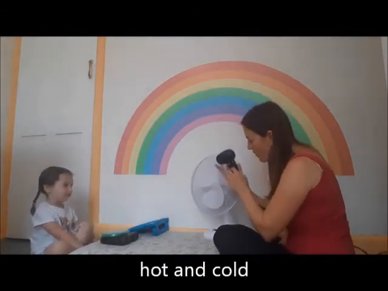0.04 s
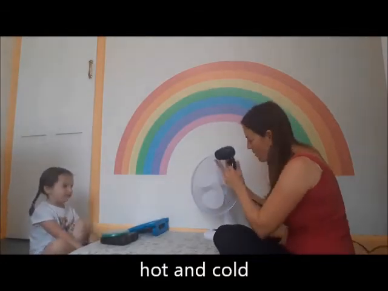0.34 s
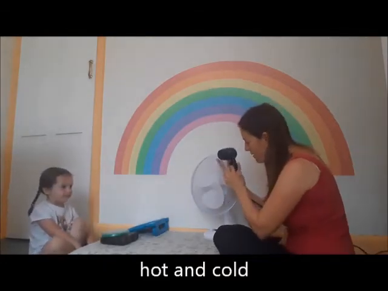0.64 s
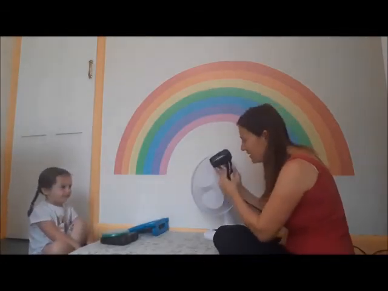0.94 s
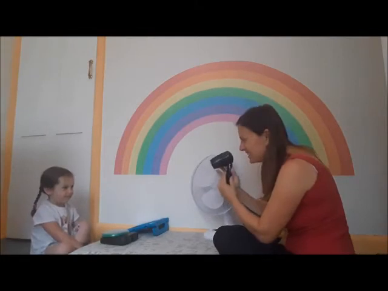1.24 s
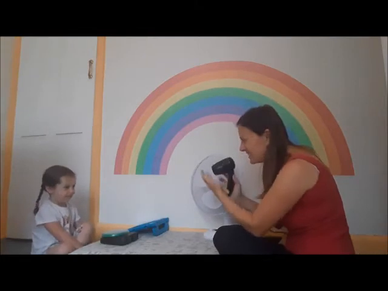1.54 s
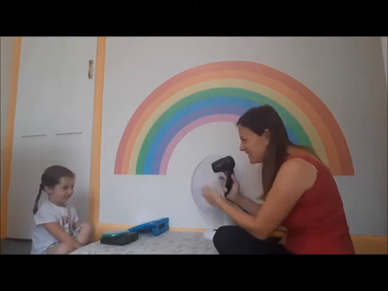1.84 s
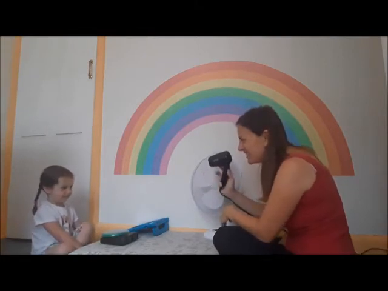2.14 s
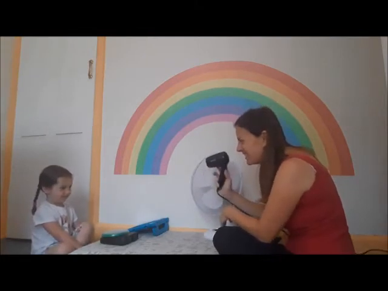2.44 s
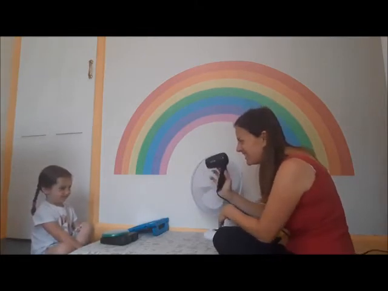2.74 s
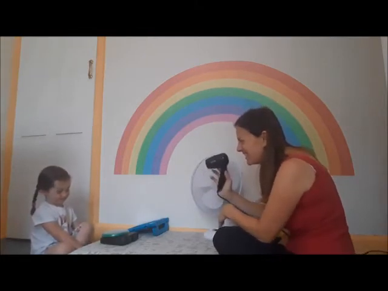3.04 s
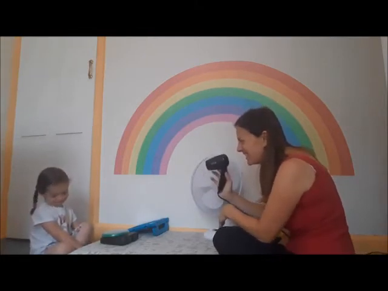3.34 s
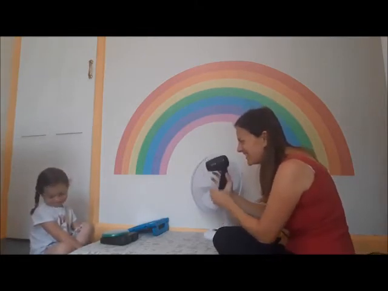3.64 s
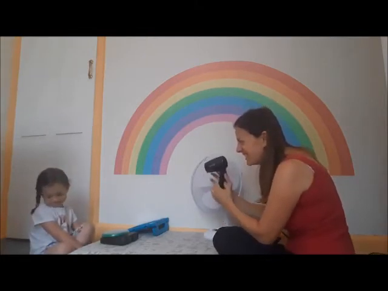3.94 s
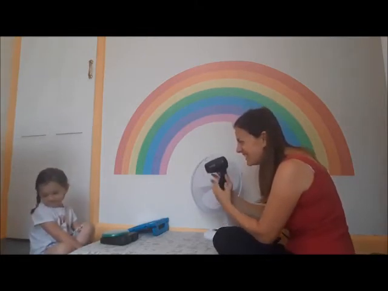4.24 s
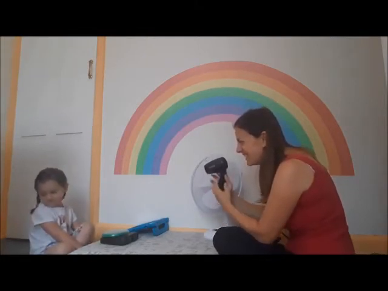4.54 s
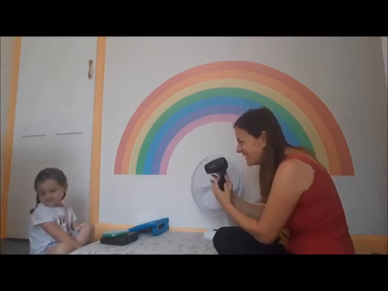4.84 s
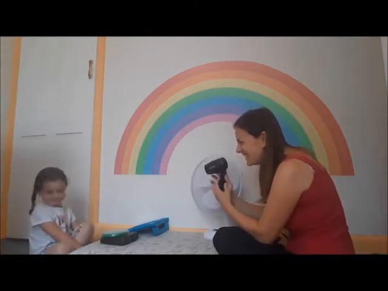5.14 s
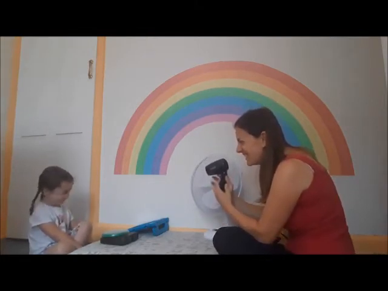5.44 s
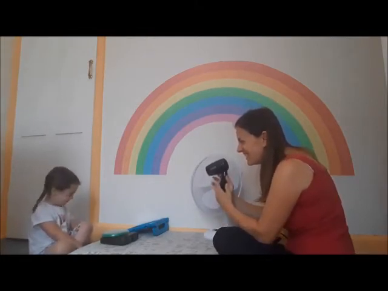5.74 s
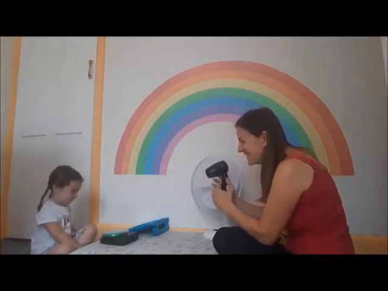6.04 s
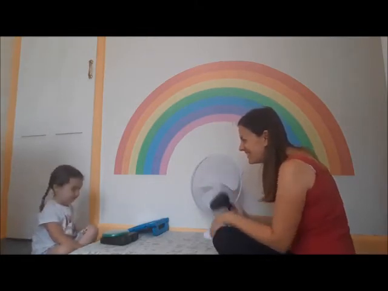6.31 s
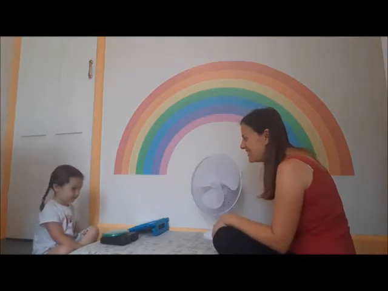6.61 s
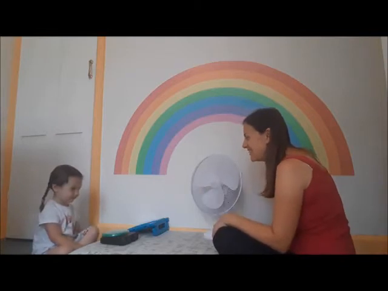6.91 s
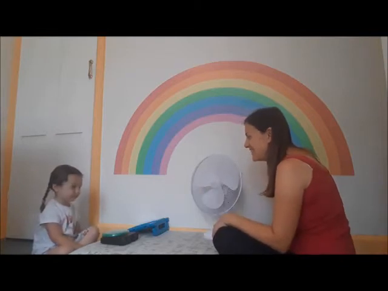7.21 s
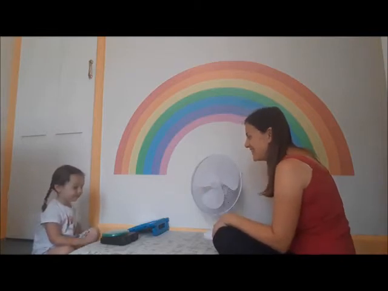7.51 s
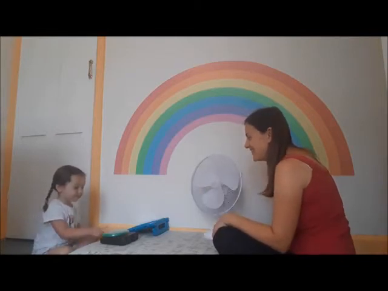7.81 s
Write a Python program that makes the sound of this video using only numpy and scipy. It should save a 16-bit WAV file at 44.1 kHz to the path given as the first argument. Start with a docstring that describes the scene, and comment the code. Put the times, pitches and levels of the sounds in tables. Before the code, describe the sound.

For the first 0.7 seconds there are soft shuffles, dull bumps and light scuffs of fingers on plastic as a small hair dryer is taken up. At about 0.7 seconds the switch snaps and the motor rises quickly in pitch, settling into a steady, hissing rush of air with a low hum and a higher whine. A dull handling bump comes at around 1.2 seconds. The blowing stays even, with the whine a little stronger from about 3.5 to 5 seconds. At 5.7 seconds the switch clicks off sharply. The air dies away and the motor winds down with a faint hiss and a slight squeak. At about 6.4 seconds the dryer lands on the floor with a short plastic clatter, followed by a soft thud or two. Only a faint room rumble remains until nearly 8 seconds. Everything is close, with a short, bare-room echo.

```python
"""Soft bumps and shuffling come first: in a bare room, near a pair of microphones, hands take up a
small hair dryer and rub its plastic. The switch snaps and the motor runs up. For five seconds the
seven-bladed fan hums and whines over the rush of turbulent air in the barrel. The switch snaps off,
the brushes hiss as the rotor coasts to rest, and the dryer clatters down on the floor."""
import sys
import numpy as np
from scipy import signal
from scipy.fft import rfft, irfft, next_fast_len
from scipy.io import wavfile

SR = 44100
rng = np.random.default_rng(int(sys.argv[2]) if len(sys.argv) > 2 else 0)


def log_audio(samples):
    """Write samples as a 16-bit WAV file to the path given in sys.argv[1]."""
    # one column per channel
    frames = np.atleast_2d(samples).T
    # limit to full scale, then quantise
    limited = np.clip(frames, -1, 1)
    pcm = np.round(limited * 32767).astype(np.int16)
    wavfile.write(sys.argv[1], SR, pcm)


N = 346934
TIME = np.arange(N) / SR
PADDED = next_fast_len(N + SR, True)
HZ = np.maximum(np.fft.rfftfreq(PADDED, 1 / SR), 1)


def from_db(db):
    """Decibels to gain."""
    return 10 ** (np.asarray(db) / 20)


def in_time(rows):
    """Each column of a curve at every sample."""
    s, *columns = np.transpose(rows)
    return [np.interp(TIME, s, column) for column in columns]


def at_hz(points, hz=HZ):
    """Read a table on a log-frequency axis."""
    at, value = np.transpose(points)
    return np.interp(np.log(hz), np.log(at), value)


def lift_db(resonances, hz):
    """How much a set of resonances raises each frequency."""
    return sum(lift / (1 + (2 * (hz - centre) / width) ** 2) for centre, width, lift in resonances)


def response(spectrum, resonances=()):
    """Causal filter with a broad colour and narrow resonances; keeps the power of white noise."""
    gain = from_db(at_hz(spectrum) + lift_db(resonances, HZ))
    cepstrum = irfft(np.log(gain / np.sqrt(np.mean(gain ** 2))), PADDED)
    cepstrum[1:PADDED // 2] *= 2
    cepstrum[PADDED // 2 + 1:] = 0
    return np.exp(rfft(cepstrum))


def filtered(x, gain):
    """Pass a sound through a frequency response."""
    return irfft(rfft(x, PADDED) * gain, PADDED)[..., :N]


def panned(db):
    """Microphone gains for a sound that is db louder on the left."""
    gains = from_db(np.array([[.5], [-.5]]) * db)
    return gains / np.sqrt(np.mean(gains ** 2, axis=0))


# Left-right likeness of background and contact sounds: wide in the mids, nearly mono above 7 kHz.
# Each row: frequency in Hz, left-right correlation.
STEREO_LIKENESS = [(130, .92), (340, .62), (500, .3), (1100, .25), (1600, -.15), (2500, .05), (6700, -.05),
                   (7100, .72), (8000, .9), (14000, .94)]

def at_microphones(pair, likeness=STEREO_LIKENESS):
    """Spectra of two unrelated sounds, mixed to a given left-right likeness."""
    mid, side = rfft(pair, PADDED)
    alike = at_hz(likeness)
    return (np.sqrt(1 + alike) * mid + np.sqrt(1 - alike) * side * [[1], [-1]]) / np.sqrt(2)


def radiated(pair, gain, likeness=STEREO_LIKENESS):
    """Sound coloured by its source and spread between left and right."""
    return irfft(at_microphones(pair, likeness) * gain, PADDED)[:, :N]


def noise(gain, likeness=STEREO_LIKENESS):
    """Steady stereo noise through a response."""
    return radiated(rng.standard_normal((2, PADDED)), gain, likeness)


def drift(rate_hz):
    """Slow random wander with spread 1."""
    slow = filtered(rng.standard_normal(PADDED), 1 / (1 + (HZ / rate_hz) ** 2))
    return slow / slow.std()


def swells(rows):
    """Gain of soft sounds that each swell to a peak and fade again."""
    return sum(from_db(db) * np.exp(-((TIME - s) / half_length) ** 2) for s, db, half_length in rows)


def placed(s, db, sound):
    """A short sound set at its time; db is its energy per channel."""
    out, start = np.zeros((2, N + SR)), int(s * SR)
    unit_energy = sound / np.linalg.norm(sound, axis=-1, keepdims=True)
    out[:, start:start + sound.shape[-1]] = from_db(db) * unit_energy
    return out[:, :N]


# The still room, all around the microphones. Each row: frequency in Hz, relative level in dB.
ROOM_TONE = [(25, -30.5), (58, -26), (82, 0), (135, -3.5), (165, -13), (220, -5.5), (300, -21.5),
             (460, -9.5), (640, -29.5), (850, -9), (1100, -10.5), (1600, -28), (5500, -38), (15000, -36)]

def room_tone(level_db=-67.5):
    """A faint, steady rumble lies under everything."""
    return noise(response(ROOM_TONE) * panned(1.5)) * from_db(level_db)


# Movement by the dryer. Each row: peak time in seconds, level in dB, half length in seconds.
SHUFFLES = [(0.1, -64, 0.37), (0.7, -64.5, 0.29), (6.25, -65.5, 0.3)]
# Its muffled colour. Each row: frequency in Hz, relative level in dB.
SHUFFLE_COLOUR = [(50, -33), (90, -7), (220, -3.5), (370, -2), (620, -13.5), (900, -4.5), (1700, -29.5),
                  (5500, -33.5), (7600, -27.5), (15000, -36)]

def shuffling(swing_db=2):
    """Soft, uneven shuffling as the dryer is taken up and put down."""
    return noise(response(SHUFFLE_COLOUR)) * swells(SHUFFLES) * from_db(swing_db * drift(11.4))


def contact(s, db, rise_s):
    """A cluster of tiny impacts that swells and dies away, drawn twice for a stereo spread."""
    age = np.arange(SR // 4) / SR / rise_s
    return placed(s, db, rng.standard_normal((2, len(age))) * age * np.exp(-age))


def thud(s, db, rise_s, hz):
    """A heavily damped body swings for a few cycles under a push."""
    age = np.arange(SR // 4) / SR
    return placed(s, db, np.sin(2 * np.pi * hz * age) * age * np.exp(-age / rise_s))


# Bumps of hand and body, then the landing on the floor. Each row: start in seconds, clatter level
# before dulling in dB, rise in seconds, dulling cutoff in Hz, thud pitch in Hz, thud level in dB.
BUMPS = [(0.017, -36, 0.011, 447, 352, -26.5), (0.366, -27, 0.034, 400, 210, -25.5),
         (0.485, -20, 0.0053, 700, 250, -26), (0.541, -20, 0.0046, 396.5, 239, -18.5),
         (0.549, -28, 0.0093, 493, 370.5, -14), (1.168, -12.5, .02, 507, 479, -18.5),
         (1.19, -30, 0.006, 500, 236, -11), (6.086, -23, 0.022, 600, 185, -43),
         (6.398, -15, 0.0051, 10000, 216, -13.5), (6.41, -9.5, 0.0072, 9100, 375, -13.5),
         (6.424, -23, 0.0055, 2000, 244, -10), (6.684, -17.5, 0.024, 262, 98.6, -27),
         (6.817, -31, 0.019, 199, 127, -34.5)]
# The clatter's colour. Each row: frequency in Hz, relative level in dB.
BUMP_COLOUR = [(50, -31), (110, -28), (220, -6.5), (380, 4), (620, -10), (900, -4.5), (1300, -4.5),
               (1900, -13.5), (2800, -11), (5000, -16), (8000, -22), (15000, -34)]

def bumps(room, clatter_wet_db=-1, thud_wet_db=-9):
    """Each bump is a thud with some clatter: dull for hands, bright when the dryer lands."""
    clatter, thuds = 0, 0
    for s, db, rise_s, dull_hz, thud_hz, thud_db in BUMPS:
        dulling = signal.butter(2, dull_hz, fs=SR, output="sos")
        clatter = clatter + signal.sosfilt(dulling, contact(s, db, rise_s) + 1e-18)
        thuds = thuds + thud(s, thud_db, rise_s, thud_hz)
    clatter = radiated(clatter, response(BUMP_COLOUR) * (1 + from_db(clatter_wet_db) * room))
    return clatter + filtered(thuds, 1 + from_db(thud_wet_db) * room)


# The bare room's reverberation. Each row: frequency in Hz, time to fall 60 dB in seconds.
ROOM_T60 = [(150, 0.35), (400, 0.324), (1200, 0.39), (3000, 0.38), (7500, 0.3), (15000, 0.23)]

def room_response(build_s=0.0054):
    """Diffuse echoes build up at the microphones and die away band by band."""
    age, tail = np.arange(SR) / SR, 0
    spectrum, hz = rfft(rng.standard_normal((2, SR))), np.arange(SR // 2 + 1)
    edges_hz = [0, 300, 700, 2000, 5000, 10000, SR / 2]
    for low, high in zip(edges_hz, edges_hz[1:]):
        band = irfft(spectrum * ((hz >= low) & (hz < high)))
        tail = tail + band * from_db(-60 * age / at_hz(ROOM_T60, (low + high) / 2))
    tail = tail * (1 - np.exp(-(age / build_s) ** 2))
    return at_microphones(tail / np.sqrt(np.sum(tail ** 2) / 2))


# Scuffs on the handle. Each row: start in seconds, level in dB, rise in seconds.
RUBS = [(0.198, -35, 0.001), (0.212, -38, 0.0083), (0.5, -35, 0.019), (0.578, -34.5, 0.0016),
        (0.687, -29, 0.002), (0.692, -29, 0.0063), (5.926, -21, 0.00054), (6.142, -30, 0.0085),
        (6.568, -40.5, 0.04)]
# Skin on plastic. Each row: frequency in Hz, relative level in dB.
RUB_COLOUR = [(300, -14), (620, -12), (900, 11), (1700, -6), (3200, 2), (5500, -6.5), (7600, -3),
              (11000, -11), (15500, -21)]

def fingers(room, wet_db=1):
    """Fingers shift on the plastic in short, bright scuffs."""
    rubs = sum(contact(*row) for row in RUBS)
    return radiated(rubs, response(RUB_COLOUR) * (1 + from_db(wet_db) * room))


# Switch and buttons. Each row: start in seconds, snap level in dB, snap rise in seconds,
# knock pitch in Hz, knock level in dB.
SNAPS = [(0.489, -29.5, 0.0012, 900, -36), (0.709, -6.5, 0.0017, 830, -17.5),
         (0.7335, -20, 0.0028, 810, -21.5), (5.696, -17, .0015, 1200, -18.5),
         (5.6981, 1, 0.0007, 1450, -15.5), (5.7055, -11.5, 0.0016, 1230, -14)]
# The snap's colour. Each row: frequency in Hz, relative level in dB.
SNAP_COLOUR = [(100, -34), (400, -22.5), (620, -28), (850, -8), (1800, -16), (3000, -5), (4200, -5.5),
               (6000, -0.5), (7200, 1), (8600, -5.5), (12000, -6.5), (15500, -15)]
# Resonances of the plastic shell. Each row: centre in Hz, width in Hz, lift in dB.
SHELL = [(3146, 330, 6), (5700, 250, 3.5), (7250, 900, 4)]

def switch(room, wet_db=1, knock_s=0.0046, knock_wet_db=-2):
    """The slider snaps over and knocks the hollow plastic shell."""
    snaps = sum(contact(s, db, rise_s) for s, db, rise_s, _, _ in SNAPS)
    knocks = sum(thud(s, db, knock_s, hz) for s, _, _, hz, db in SNAPS)
    snaps = radiated(snaps, response(SNAP_COLOUR, SHELL) * (1 + from_db(wet_db) * room))
    return snaps + filtered(knocks, 1 + from_db(knock_wet_db) * room)


FULL_SPEED_HZ = 236  # turns per second
# The motor creeps faster as it warms. Each row: time in seconds, turns per second.
RUNNING_SPEED = [(1.75, 234.6), (3.0, 234.9), (3.6, 236.1), (4.75, 236.1), (5.1, 237.2)]

def motor_speed(on_s=0.71, off_s=5.7, spin_up_s=0.178, coast_s=0.59, friction=0.3):
    """Share of full speed: the rotor runs up under power, then air drag and dry friction stop it."""
    run_up = 1 - np.exp(-np.maximum(TIME - on_s, 0) / spin_up_s)
    coast = (1 + friction) * np.exp(-np.maximum(TIME - off_s, 0) / coast_s) - friction
    return in_time(RUNNING_SPEED)[0] / FULL_SPEED_HZ * run_up * np.maximum(coast, 0)


# Brush scrape and squeak, both left of centre. Each row: frequency in Hz, relative level in dB.
SCRAPE_COLOUR = [(1000, -8), (3700, 1.5), (5500, -8.5), (7600, -1), (9100, -6.5), (10300, -2.5),
                 (15000, -13)]
SQUEAK_COLOUR = [(7000, -32), (7600, -7), (8100, -13), (8500, 1), (8900, -11), (9800, -25)]
# Squeaks as the rotor starts and slows. Each row: peak time in seconds, level in dB,
# half length in seconds.
SQUEAKS = [(0.87, -55, 0.065), (6.02, -55.5, 0.04), (6.2, -64, 0.083)]

def brushes(speed, chatter=0.16, scrape_db=-61.5, stall_share=0.047):
    """The brushes scrape once a turn, heard while the air is weak, and squeak faintly in fits."""
    turn = np.sin(2 * np.pi * np.cumsum(FULL_SPEED_HZ * speed) / SR)
    squeak = noise(response(SQUEAK_COLOUR)) * panned(5.0) * swells(SQUEAKS)
    turning = np.tanh(speed / stall_share)  # fades only near standstill
    scrape = noise(response(SCRAPE_COLOUR)) * panned(1.5) * from_db(scrape_db) * turning
    return (scrape + squeak) * (1 + chatter * turn)


def wall_echoes(echo_db, count=8):
    """Early reflections from the wall and the holder's body comb the sound finely."""
    taps = np.zeros(PADDED)
    signs = rng.choice([-1, 1], count)
    delays_s = rng.uniform(.002, .025, count)
    taps[(delays_s * SR).astype(int)] = from_db(echo_db) * signs
    return 1 + rfft(taps)


LEFT_LEAD_S = 7e-5  # the dryer is about 2.4 cm nearer the left microphone
# Turbulence in the barrel. Each row: frequency in Hz, relative level in dB.
RUSH_COLOUR = [(60, -45.5), (130, -22.5), (420, -17.5), (630, -25), (780, -17), (920, -8.5), (1250, -2),
               (1500, -8), (2200, -12.5), (3000, -9), (3600, -14.5), (5500, -15), (10500, -17),
               (13000, -25), (15500, -25.5)]
# Resonances of barrel and grille. Each row: centre in Hz, width in Hz, lift in dB.
BARREL = [(880, 51, 8), (983, 40, 7), (1136, 28, 7.5), (1243.5, 64, 9), (1345.5, 24, 9.5), (1527, 13, 9.5),
          (1604, 20, 7.5), (1637, 46, 3.5), (1965, 60, 4), (2620, 100, 3.5), (3065, 65, 1),
          (4170, 590, 6.5), (4977, 124.6, 8), (6240, 300, 6.5), (7480, 1200, 5)]
# The rush across the microphone pair. Each row: frequency in Hz, left-right correlation.
RUSH_LIKENESS = [(240, .86), (380, .7), (560, -.4), (680, .5), (830, .9), (980, .3), (1200, .8),
                 (1550, -.45), (2000, .4), (2300, -.1), (3050, .5), (4000, .15), (4500, -.15), (5600, -.25),
                 (6800, .25), (7000, .9), (8000, .95), (8600, .55), (10000, .7), (11200, .9), (14000, .7)]
# Its lean to the left microphone. Each row: frequency in Hz, left over right in dB.
RUSH_BALANCE = [(150, 0.5), (450, 2), (700, 0.5), (1250, 3), (1800, 0), (2700, 2), (4000, 0), (7600, -1),
                (8500, 5), (9900, 6), (11200, 0.5)]

def air(speed, roar_db=-40, hiss_db=-38, split_hz=1750, gust_db=0.47, flutter_db=0.5):
    """Turbulence in the barrel grows as a power of fan speed, the hiss faster than the roar."""
    # lows and mids reach the left microphone slightly earlier
    lead = np.exp(1j * np.pi * HZ * LEFT_LEAD_S * np.array([[1], [-1]]) / (1 + (HZ / 2300) ** 8))
    barrel = response(RUSH_COLOUR, BARREL) * panned(at_hz(RUSH_BALANCE)) * lead
    low_share = 1 / (1 + (HZ / split_hz) ** 8)
    roar = noise(barrel * np.sqrt(low_share), RUSH_LIKENESS)
    hiss = noise(barrel * np.sqrt(1 - low_share) * wall_echoes(echo_db=-20), RUSH_LIKENESS)
    roar = roar / roar.std() * speed ** 2.04 * from_db(roar_db + gust_db * drift(9.4))
    hiss = hiss / hiss.std() * speed ** 3.47 * from_db(hiss_db + flutter_db * drift(16))
    return roar + hiss


# Fan tones. Each row: multiple of the turning rate, base level in dB, left over right in dB.
FAN_TONES = [(1, -56, -5), (2, -62.5, 11.5), (3, -61.5, -5), (6, -58, 2), (7, -53, -2.5), (8, -57.5, -7),
             (14, -52.5, -3)]
# How they carry to the microphones as the hand turns the dryer.
# Each row: time in seconds, hum lift in dB, blade whine lift in dB.
AIM = [(3.1, 1.5, 1.5), (3.5, -0.5, 5), (4.9, -1.5, 5.5), (5.3, -3, 2)]
# Standing waves where the microphones stand. Each row: centre in Hz, width in Hz, lift in dB.
STANDING_WAVES = [(212.6, 36, 17), (469.9, 3.4, -6.5), (697.3, 24, 17.5)]

def fan(speed, jitter=.0003, mains_hz=50, mains_ripple=0.00966, growth_power=3.5, flutter_db=3.0):
    """Imbalance hums at the turning rate; the blades whine at seven times that, with mains sidebands."""
    # the pulsing mains current shakes the speed
    unsteady = 1 + jitter * drift(10.5) + mains_ripple * np.sin(2 * np.pi * mains_hz * TIME)
    angle = 2 * np.pi * np.cumsum(FULL_SPEED_HZ * speed * unsteady) / SR
    angle = angle + 2 * np.pi * FULL_SPEED_HZ * LEFT_LEAD_S * np.array([[1], [0]])
    hum_db, whine_db = in_time(AIM)
    out, grid_hz = 0, np.arange(SR // 4)
    path_db = lift_db(BARREL, grid_hz) + lift_db(STANDING_WAVES, grid_hz)
    for order, db, pan_db in FAN_TONES:
        full_hz = round(order) * FULL_SPEED_HZ
        aim_db = hum_db if order == 1 else whine_db if order > 3 else 0
        # a gliding tone swells as it crosses a resonance of the barrel or the room
        swell_db = np.interp(full_hz * speed, grid_hz, path_db) - path_db[full_hz]
        # the hum is steady; higher tones waver with the uneven inflow
        waver_db = flutter_db * (1 - 1 / order) ** 2 * drift(5.8)
        tone = np.sin(order * angle + rng.uniform(0, 2 * np.pi))
        out = out + from_db(db + aim_db + swell_db + waver_db) * panned(pan_db) * tone
    return out * speed ** growth_power


def scene():
    """One motor speed drives air, tones and brushes; every contact echoes in the same room."""
    speed, room = motor_speed(), room_response()
    dryer = air(speed) + fan(speed) + brushes(speed)
    handling = switch(room) + bumps(room) + fingers(room)
    return dryer + handling + room_tone() + shuffling()


def record(dry):
    """Both channels are cut steeply above 15.8 kHz."""
    return signal.sosfilt(signal.ellip(12, .1, 80, 15800, fs=SR, output="sos"), dry)


dry = scene()
out = record(dry)
log_audio(out)
```